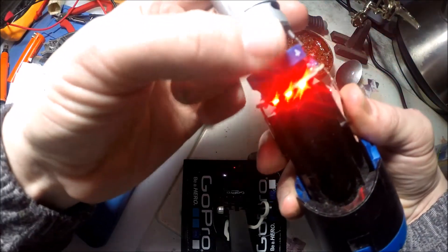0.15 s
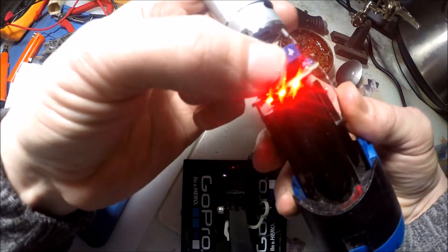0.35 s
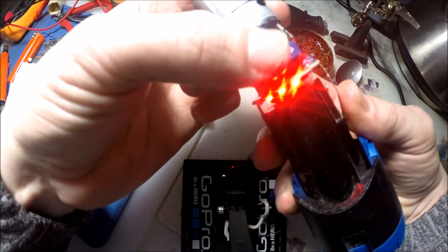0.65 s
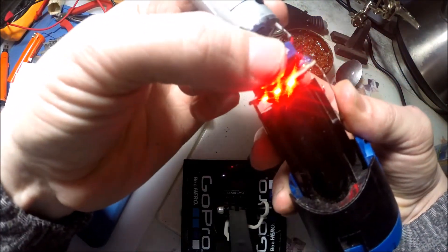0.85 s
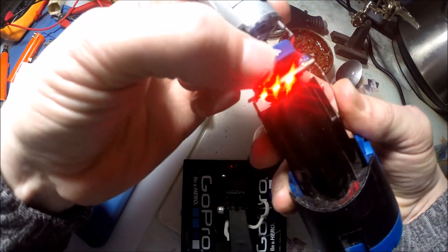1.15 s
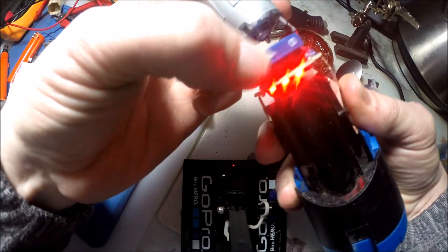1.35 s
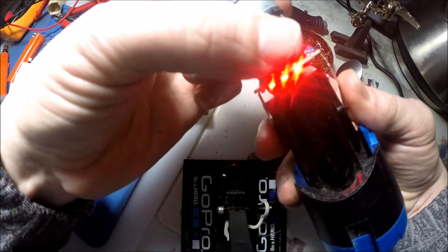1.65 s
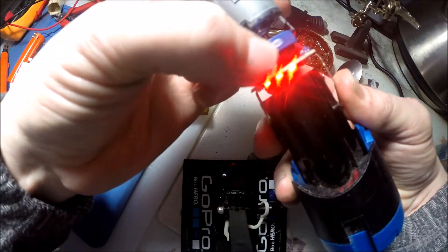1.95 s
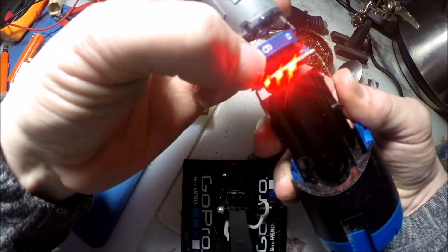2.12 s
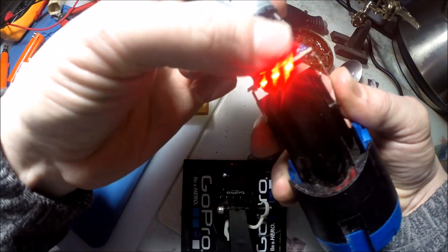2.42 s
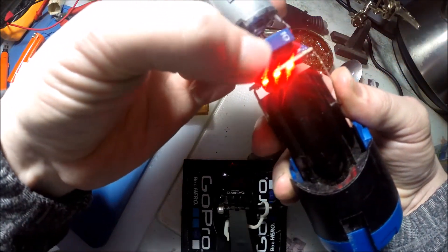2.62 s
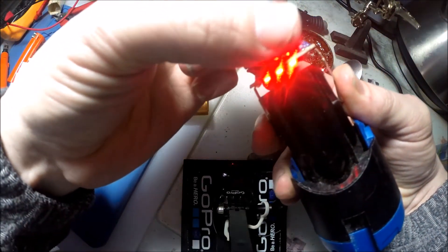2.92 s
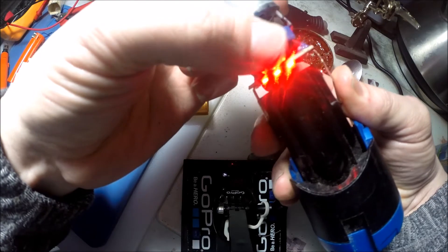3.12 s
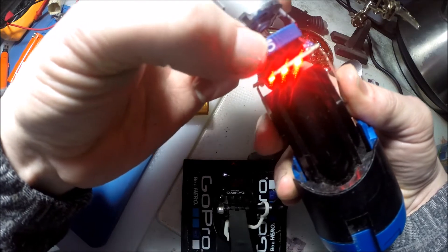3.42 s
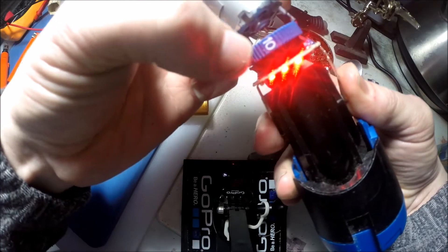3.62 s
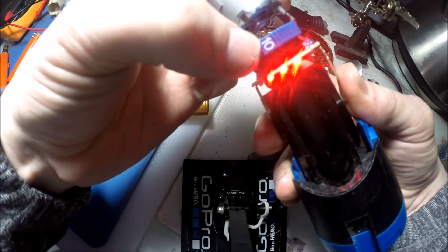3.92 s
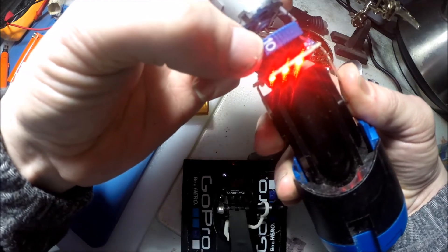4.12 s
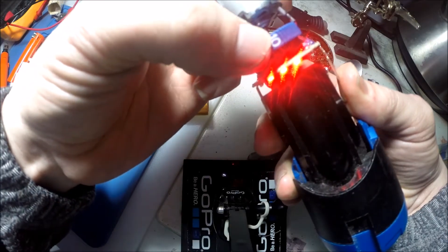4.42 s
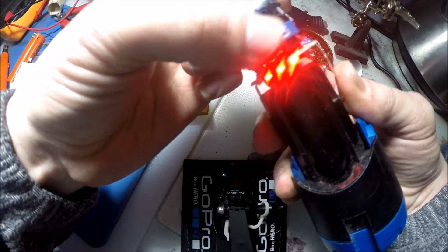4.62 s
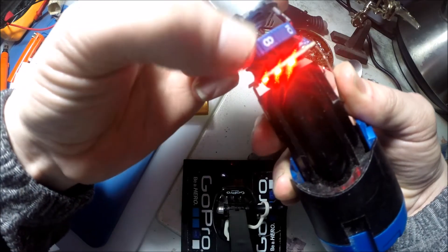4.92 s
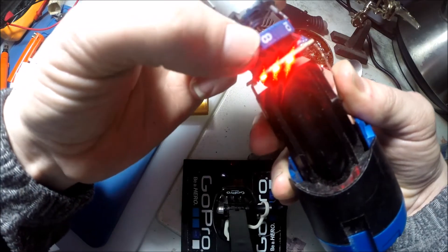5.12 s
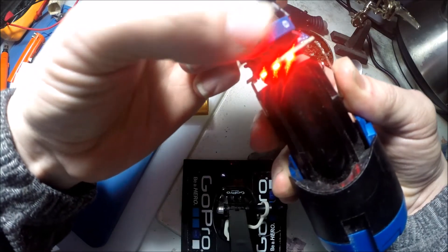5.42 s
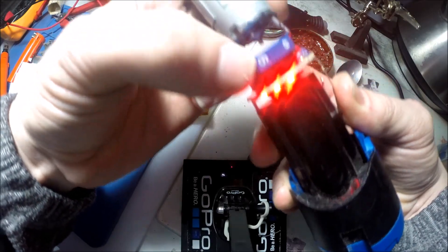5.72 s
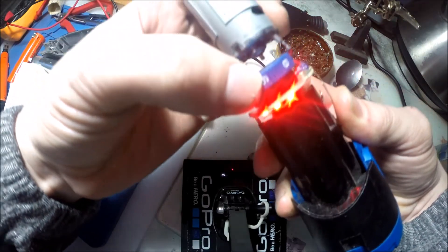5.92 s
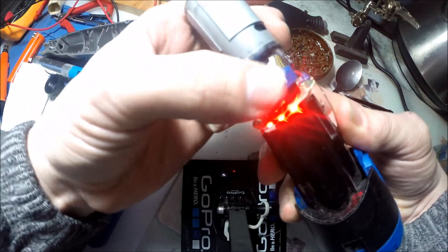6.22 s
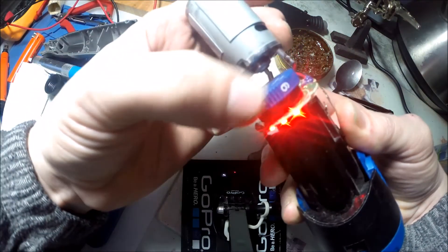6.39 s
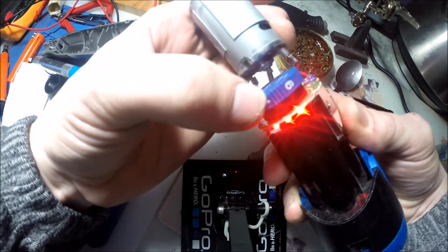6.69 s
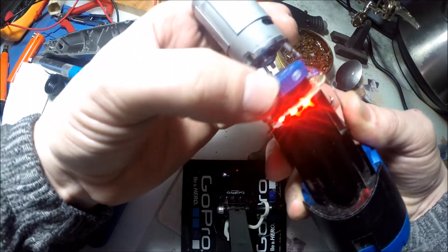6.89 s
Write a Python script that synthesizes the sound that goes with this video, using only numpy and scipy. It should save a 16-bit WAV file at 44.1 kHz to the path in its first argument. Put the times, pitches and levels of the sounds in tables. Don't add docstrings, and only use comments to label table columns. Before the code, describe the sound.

A small handheld electric motor whines close up, climbing in uneven steps to a piercing high pitch, holding, then sagging slightly, still running at the end.

```python
import sys
import numpy as np
from scipy import signal
from scipy.fft import rfft, irfft, next_fast_len
from scipy.io import wavfile
from scipy.ndimage import uniform_filter1d

SR = 44100
rng = np.random.default_rng(int(sys.argv[2]) if len(sys.argv) > 2 else 0)


def boost_factor(decibels):
    exponent = np.asarray(decibels, float) / 20
    return 10 ** exponent


def pcm_store(signal):
    levels = np.round(np.clip(np.atleast_2d(signal), -1, 1) * 32767)
    wavfile.write(sys.argv[1], SR, levels.astype(np.int16).T)


N = 310990

# start_s, length_s, speed_change_turns_per_s
STROKES = [(-0.269, 0.471, 35.44), (0.202, 0.309, 9.94), (0.608, 0.466, 7.18), (1.075, 0.261, 27.63),
           (1.252, 0.116, 43.94), (1.374, 0.295, 49.05), (1.669, 0.348, 26.67), (2.018, 0.178, 25.37),
           (2.118, 0.735, 13.14), (2.617, 0.136, 29.67), (3.225, 0.11, 46.54), (3.225, 1.089, -7.01),
           (3.884, 0.303, 5.45), (4.673, 0.061, -23.34), (4.735, 0.249, -19.09), (5.093, 0.283, -4.92),
           (5.313, 0.115, -13.15), (5.427, 0.432, -5.61), (6.245, 0.087, -14.07), (6.324, 0.279, -6.0)]
START_TURNS_PER_S, TURN_BACK_S = 129.89, 4.4
SPIN_UP_LAG_S, COAST_LAG_S = 0.07, 0.117

# multiple, level_db at 400 turns per s, growth_db_per_octave
WHINE, POLE = (9, -15.3, 16.4), (3, -36.8, 6.6)
WOBBLE, BRUSH = (2, -48.8, 12.1), (12, -44, 5.8)
# multiple, slow_db, middling_db, fast_db
ROTOR_ORDERS = [(1, -0.5, -13, 1), (4, 1.5, 11, -1), (5, -3, 8, 4), (6, 13.5, 3, 12.0), (7, 4, 9.0, -33),
                (8, 5.5, -1, 17), (10, 0.5, 8.0, -0.5), (11, 2, 2, -5.5), (13, 3.5, -14.0, 0.5),
                (14, -8, -8, -2.0), (15, 3, 8, 2.5), (16, -3, 7, -10), (17, -2, 3, -15), (18, -1, 4, 3.5),
                (19, 14, -2, -2), (20, -1, -1.0, -9), (21, 6.5, -3, 0), (22, 9.0, 7.5, -3), (23, 2, 3, -4),
                (24, -2, -6.0, 7.5), (25, 4.5, -2.5, -4), (26, 3.5, -10, 1), (27, -0.5, -7, 2.0),
                (28, -4, -11, 4), (29, -3, -5.0, 6), (30, -3, -5.0, -10), (31, -4, -10.0, -2.0),
                (32, -9, -7, -7), (33, 1, -4, 12), (34, -8, -3.0, -8)]
PATTERN_TURNS_PER_S = (178, 262, 380)
# turns_per_s, weak_orders_db, locked_rattle_share
SHAKE = [(155, -49.5, 0.2), (171, -44, 0.2), (177.6, -42.5, 0), (183, -40.5, 0.8), (201, -40, 0),
         (220, -36.5, .7), (243, -34, 1), (260.6, -32, .9), (258, -39, 0), (312, -40.5, 0.04),
         (373, -38, 0.44), (440, -34, 0.06)]
# freq_hz, level_db
SHELL = [(150.0, -15), (600.0, -16), (1100.0, -9.5), (1800.0, -10), (2500.0, -16), (3200.0, -20.5),
         (3900.0, -12), (4500.0, -0.5), (5100.0, -5.5), (5800.0, -11), (7500.0, -12), (9000.0, -22.5),
         (11500.0, -29), (15000.0, -39)]
# freq_hz, width_hz, level_db
RIBS = [(250, 100, -2), (458, 115, -10), (700, 54, 5.5), (1290, 860, -6.5), (3500, 950, -6.5),
        (4010, 180, 6), (4260, 230, -10), (3545, 50, -4), (5240, 80, -5), (4883, 71, 6.5), (5700, 760, -5),
        (6530, 400, 2.5), (7860, 250, 4.5), (11700, 270, 3.5)]
# freq_hz, width_hz, level_db
SHROUD = [(1516.7, 103.8, -8.5), (2323.0, 121.0, 14.5), (2376.5, 366.5, -19.7), (2678.4, 75.5, -24.3),
          (2884.0, 900.0, 10.0), (2942.0, 100.3, -18.2), (3109.8, 111.0, -17.8), (3154.7, 37.5, 7.1),
          (3276.0, 44.6, -22.4), (3410.3, 16.1, 3.2), (3463.2, 25.6, -13.6), (3472.2, 35.4, 9.2),
          (3637.1, 481.3, -16.1), (3826.5, 106.9, 4.9)]
# freq_hz, width_hz, level_db
HANDLE = [(545.9, 327.7, -36.0), (582.0, 207.3, 28.1), (721.7, 12.0, -14.4), (787.9, 174.1, 14.6),
          (835.8, 43.2, -18.8), (884.1, 16.0, 5.1), (1023.9, 130.2, 6.1), (1202.9, 12.0, -13.6),
          (1311.0, 56.5, -25.8), (1321.7, 20.8, 24.5)]
# freq_hz, width_hz, level_db
GRIP_NULL = [(817, 32, -7)]
# freq_hz, width_hz, level_db
CAP = [(2376.5, 476.8, -9.1), (2813.0, 335.3, 7.4), (3446.1, 176.0, -18.8), (4362.9, 12.0, -23.9),
       (4575.8, 122.0, 9.9), (4746.5, 86.3, 9.7), (4801.6, 12.0, -24.2), (5000.3, 583.8, 26.3),
       (5201.5, 900.0, -23.0), (5283.7, 44.3, 18.2)]
# time_s, level_db
HAND = [(0.0, -1.5), (0.5, 0.5), (1.2, 1.5), (2.0, -0.1), (2.5, -3.5), (2.9, -2), (3.3, 2.2), (3.6, -1.5),
        (4.0, 0.1), (4.4, 0.9), (4.7, -0.4), (5.2, 5), (5.6, 0.5), (5.9, -0.1), (6.27, -2.5), (6.6, 2),
        (6.92, 4), (7.05, 1.5)]
COAST_POLE_DB = -2.5
LINES_FADE_HZ, LINES_FADE_DB = 12200, -9
EDGE_HZ = 15350.0
CONTROL_STEP = 64

# turns_per_s, rush_db, rattle_db, fizz_db
AIR_LAW = [(145, -50.5, -61, -50), (167, -50, -47, -52.5), (179, -42.5, -42, -57), (185, -44.5, -34, -50),
           (203, -35, -32, -45), (240, -36, -35, -46), (247, -35, -22, -44), (258.5, -35, -27, -43),
           (260, -32.5, -31, -42), (277, -32, -39, -42), (283, -31.5, -30.5, -40.5), (320, -29.5, -34, -46),
           (364, -27.5, -34.5, -42), (377, -27, -32, -40.5), (398, -26.5, -30, -38), (428, -25, -28, -38)]
# freq_hz, width_hz, level_db
CHAMBER = [(674, 530, -22), (1388, 520, -4.5), (1932, 532, -1), (2794, 450, 1.5), (3090, 750, -6),
           (3930, 360, -4), (4480, 300, -5.5)]
# freq_hz, width_hz, level_db
RUSH_PATH = [(2490, 52, 0), (2785, 35, 4.5), (2930, 53, -14), (3015, 90, 4), (3120, 37, -8), (3185, 70, 5.5),
             (3260, 45, -10), (3450, 36, 7.5), (3830, 40, -4), (4130, 60, 0), (4240, 80, 3), (4650, 74, 2.5)]
# freq_hz, width_hz, level_db
VENTS = [(5800, 590, 0), (6500, 960, -2), (7750, 1150, -1.5), (10070, 1320, -6), (12000, 450, -31),
         (13900, 1200, -28)]
# freq_hz, width_hz, level_db
SPRINGS = [(4050, 690, 4.5), (4387, 120, 9), (4820, 290, 4.5), (5330, 290, -1.5), (7400, 210, -34.5),
           (11800, 350, -17)]

# freq_hz, width_hz, level_db
ROOM = [(22, 9.4, -5.5), (56.7, 15, -9), (86.1, 14.5, -0.5), (124, 9.5, -7.5), (137.3, 12, -10.5),
        (176, 25, -11), (209.6, 9.8, -13), (457, 3600, -23.5)]
# freq_hz, level_db, waver_db
HUM = [(100.8, -48.5, 2), (200, -54, 2)]
ROOM_DB, HISS_DB = -44.5, -70

# time_s, threshold_db
DROPOUTS = [(1.722, -61), (1.893, -62), (2.042, -64), (2.170, -62), (2.447, -62), (2.661, -60),
            (3.066, -59), (3.343, -57), (3.514, -57), (3.621, -60), (3.663, -59), (3.813, -58),
            (4.005, -58), (4.111, -54), (4.133, -52), (4.239, -61), (4.687, -59), (6.522, -60),
            (6.565, -59), (6.629, -63), (6.821, -61)]
DROPOUT_SAMPLES = 1882


def evened(x):
    return x / np.sqrt(np.mean(x ** 2) + 1e-20)


def curves(rows):
    time_s, *columns = np.transpose(rows)
    return [np.interp(np.arange(N) / SR, time_s, c) for c in columns]


def by_speed(rows, speed):
    turns_per_s, *columns = np.transpose(rows)
    return [np.interp(speed, turns_per_s, c) for c in columns]


def read(points, hz):
    freq_hz, level_db = np.transpose(points)
    return np.interp(np.log(hz + 1), np.log(freq_hz + 1), level_db)


def bells(path, at_hz):
    return sum(db / (1 + (2 * (at_hz - hz) / width) ** 2) for hz, width, db in path)


def drift(per_s, step=1):
    smooth = evened(uniform_filter1d(rng.standard_normal(1000), size=3))
    return np.interp(np.arange(0, N, step) / SR * per_s * 3, np.arange(1000), smooth)


def ring(x, modes, steep):
    size = next_fast_len(N)
    hz = np.fft.rfftfreq(size, 1 / SR)
    power = sum(boost_factor(2 * db) / (1 + (2 * (hz - f) / w) ** 2) ** steep for f, w, db in modes)
    return evened(irfft(rfft(x, size) * np.sqrt(power), size)[:N])


def shaft_speed():
    t = np.arange(N) / SR
    speed = np.full(N, START_TURNS_PER_S)
    for start_s, length_s, change in STROKES:
        lag_s = SPIN_UP_LAG_S if start_s < TURN_BACK_S else COAST_LAG_S
        since_s = np.maximum([t - start_s, t - start_s - length_s], 0)
        lagged = since_s - lag_s * (1 - np.exp(-since_s / lag_s))
        speed += change * (lagged[0] - lagged[1]) / length_s
    return speed


def order_db(order, path, speed):
    k, db, per_octave_db = order
    return db + per_octave_db * np.log2(speed / 400) + bells(path, k * speed)


def strong_orders_db(speed):
    paths = ((WHINE, SHROUD), (POLE, HANDLE + GRIP_NULL), (WOBBLE, HANDLE), (BRUSH, CAP))
    strong = {order[0]: order_db(order, path, speed) for order, path in paths}
    strong[WHINE[0]] += curves(HAND)[0][::CONTROL_STEP]
    strong[POLE[0]] += 6.3 * (by_speed(SHAKE, speed)[1] - 0.3)
    coasting = np.clip(np.arange(0, N, CONTROL_STEP) / SR - TURN_BACK_S + 0.5, 0, 1)
    strong[POLE[0]] += 1.03 + COAST_POLE_DB * coasting
    return strong


def weak_order_db(k, pattern_db, speed):
    level_db = np.interp(speed, PATTERN_TURNS_PER_S, pattern_db)
    level_db = level_db + by_speed(SHAKE, speed)[0] + read(SHELL, k * speed) + 2.5
    level_db = level_db + 3.0 * drift(7.0, step=CONTROL_STEP)
    return level_db + bells(RIBS, k * speed) + LINES_FADE_DB * (k * speed > LINES_FADE_HZ)


def orders(speed, turns):
    pattern = {k: db for k, *db in ROTOR_ORDERS}
    unlisted_db = np.full(len(PATTERN_TURNS_PER_S), -3.5)
    speed = speed[::CONTROL_STEP]
    strong = strong_orders_db(speed)
    spin = np.exp(2j * np.pi * turns)
    line, out = np.ones(N, complex), np.zeros(N)
    for k in range(1, 100):
        line = line * spin
        if k in strong:
            level_db = strong[k] + 1.4 * drift(30, step=CONTROL_STEP)
        else:
            level_db = weak_order_db(k, pattern.get(k, unlisted_db), speed)
        gain = boost_factor(level_db) * (k * speed < EDGE_HZ)
        gain = np.interp(np.arange(N), np.arange(0, N, CONTROL_STEP), gain)
        out += gain * (line * np.exp(2j * np.pi * rng.random())).real
    return np.sqrt(2) * out


def fan(rush_db, fizz_db):
    air = ring(rng.standard_normal(N), CHAMBER, 1.9)
    air = irfft(rfft(air) * boost_factor(bells(RUSH_PATH, np.fft.rfftfreq(N, 1 / SR))), N)
    rush = boost_factor(rush_db + 1.5 + 0.14 * drift(12)) * air
    fizz = ring(rng.standard_normal(N), VENTS, 1.48)
    return rush + boost_factor(fizz_db + 3.0 + 0.95 * drift(9.7)) * fizz


def brushes(level_db, locked, turns):
    new_turn = np.diff(np.floor(turns), prepend=0)
    late = new_turn * (turns % 1) / np.gradient(turns)
    knocks = new_turn - late + np.roll(late, -1)
    scuff = rng.standard_normal(130) * np.exp(-np.arange(130) / 60.0)
    knocks = evened(signal.oaconvolve(knocks * boost_factor(5.3 * drift(25)), scuff)[:N])
    scrape = rng.standard_normal(N) * (1 + 0.24 * np.cos(2 * np.pi * turns))
    share = np.clip(locked, 0, 1)
    rattle = share * knocks + np.sqrt(1 - share ** 2) * scrape
    return boost_factor(level_db + 1.0) * ring(rattle, SPRINGS, 1.33)


def room():
    out = boost_factor(ROOM_DB) * ring(rng.standard_normal(N), ROOM, 1.6)
    for hz, db, waver_db in HUM:
        hum = np.sin(2 * np.pi * hz * np.arange(N) / SR)
        out += np.sqrt(2) * boost_factor(db + waver_db * drift(9.4)) * hum
    hiss = ring(rng.standard_normal(N), [(9000, 12000, 0)], 1.6)
    return out + boost_factor(HISS_DB) * hiss


def scene():
    speed = shaft_speed()
    turns = np.cumsum(speed * (1 + 0.0008 * drift(40))) / SR
    rush_db, rattle_db, fizz_db = by_speed(AIR_LAW, speed)
    locked = by_speed(SHAKE, speed)[1]
    motor = orders(speed, turns) + fan(rush_db, fizz_db) + brushes(rattle_db, locked, turns)
    return (motor + room())[None]


def band_limit(x):
    return signal.sosfilt(signal.butter(12, 15580, fs=SR, output="sos"), x)


def record(dry):
    x = dry.copy()
    window = np.sin(np.pi * (np.arange(DROPOUT_SAMPLES) + 0.5) / DROPOUT_SAMPLES)
    hz = np.fft.rfftfreq(DROPOUT_SAMPLES, 1 / SR)
    octaves = np.log2(np.maximum(hz / 5500, 1))
    for time_s, floor_db in DROPOUTS:
        middle = round(time_s * SR)
        part = slice(middle - DROPOUT_SAMPLES // 2, middle + DROPOUT_SAMPLES // 2)
        z = rfft(dry[:, part] * window)
        floor = boost_factor(floor_db + 4.0 - 9.0 * octaves)
        lost = 1 / (1 + (abs(z) / window.sum() / floor) ** 8)
        x[:, part] -= irfft(z * lost, DROPOUT_SAMPLES) * window
    lowpass = signal.firwin(401, EDGE_HZ, window=("kaiser", 9), fs=SR)
    x = signal.oaconvolve(x, lowpass[None], "same")
    return band_limit(x)


dry = scene()
out = record(dry)
pcm_store(out)
```